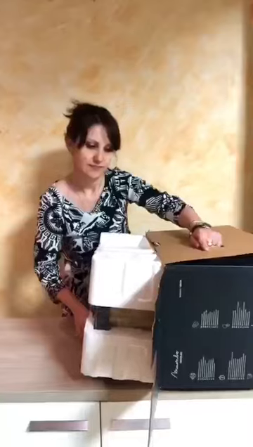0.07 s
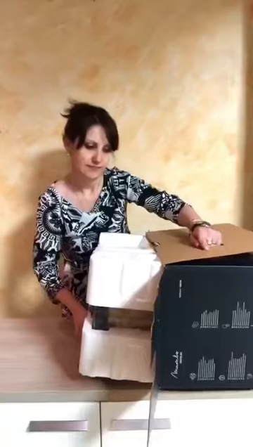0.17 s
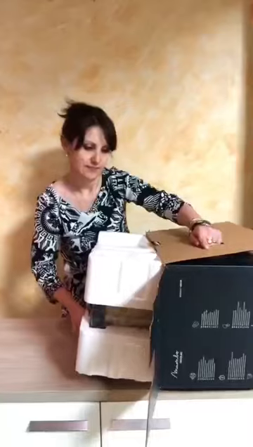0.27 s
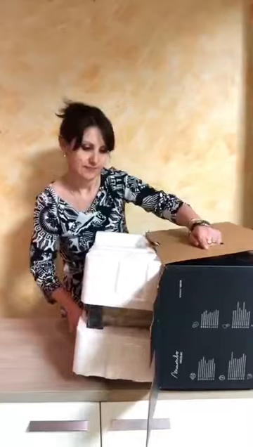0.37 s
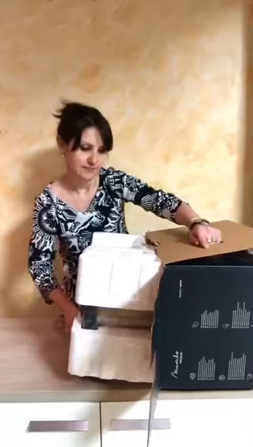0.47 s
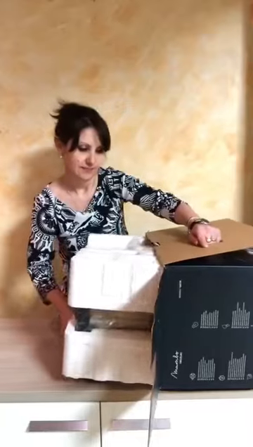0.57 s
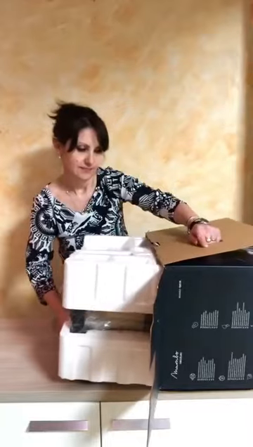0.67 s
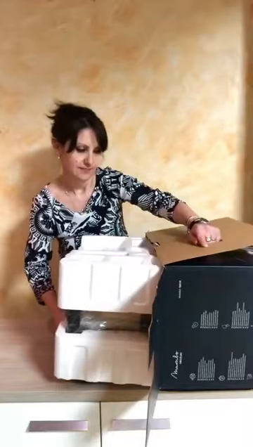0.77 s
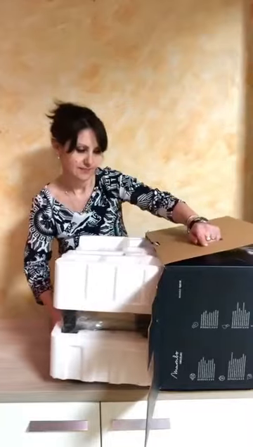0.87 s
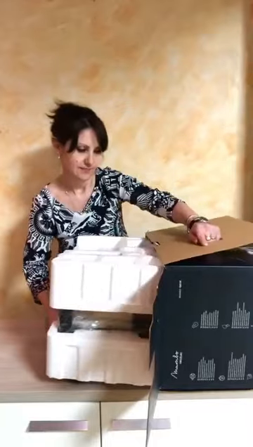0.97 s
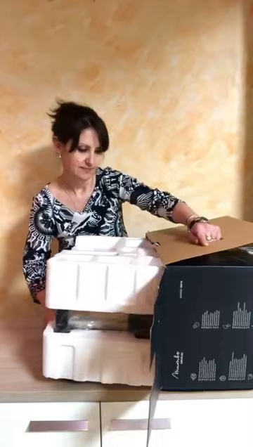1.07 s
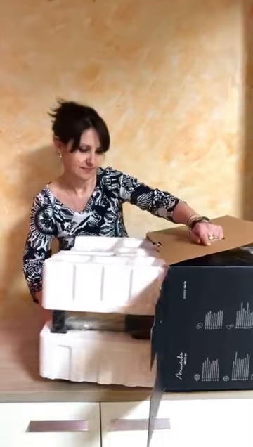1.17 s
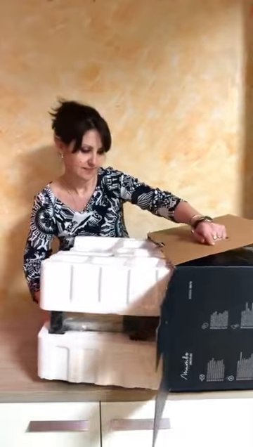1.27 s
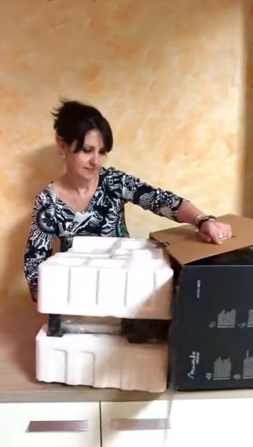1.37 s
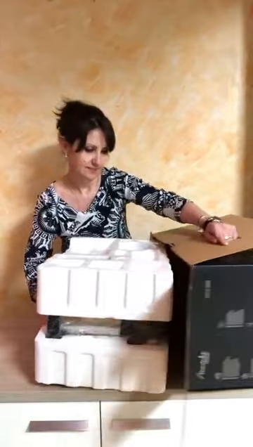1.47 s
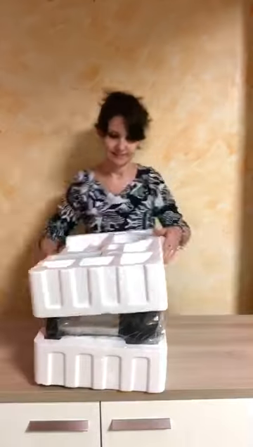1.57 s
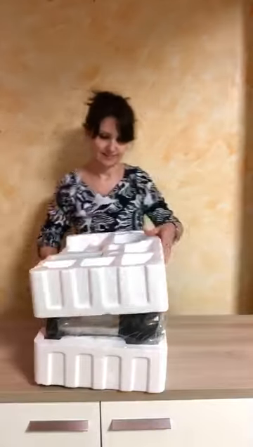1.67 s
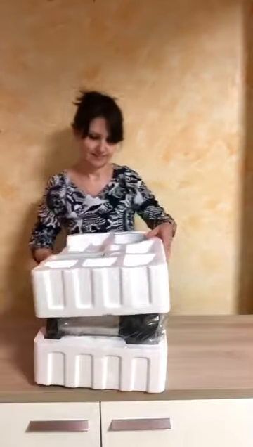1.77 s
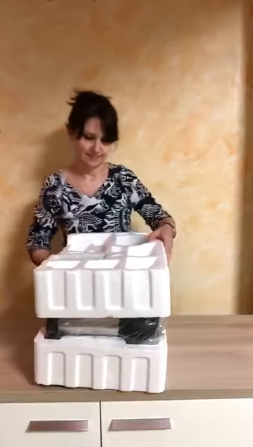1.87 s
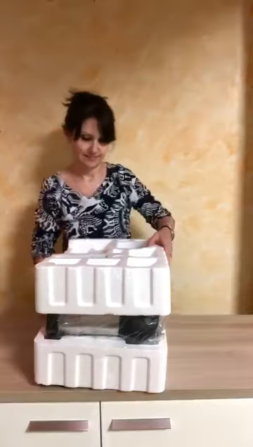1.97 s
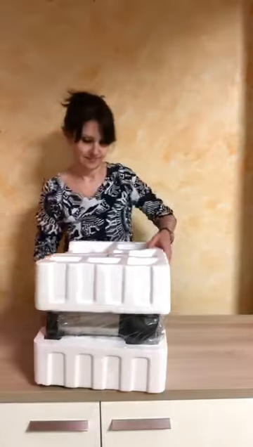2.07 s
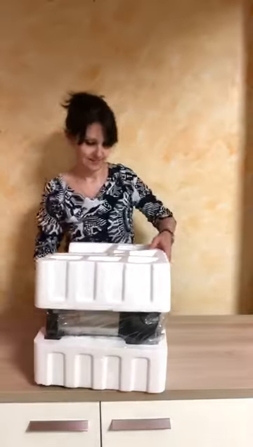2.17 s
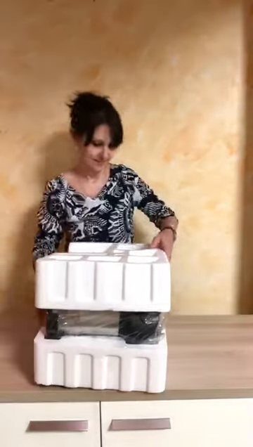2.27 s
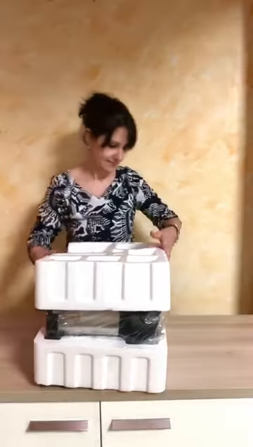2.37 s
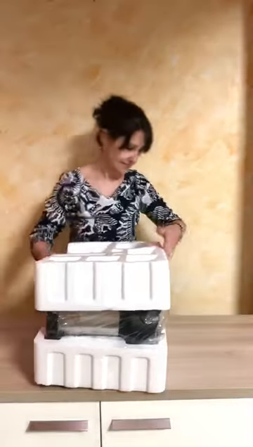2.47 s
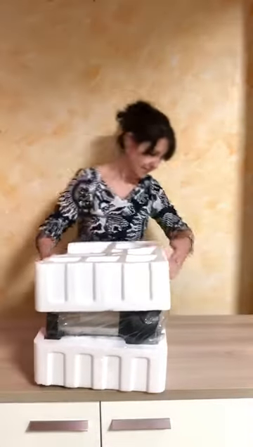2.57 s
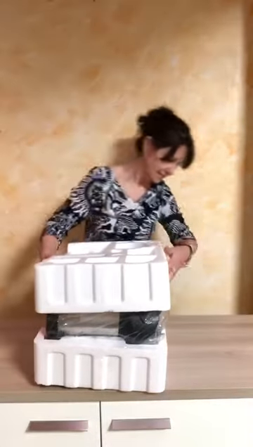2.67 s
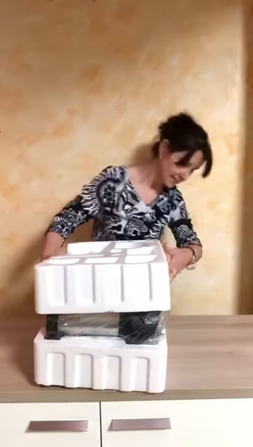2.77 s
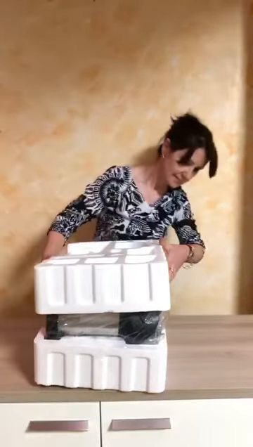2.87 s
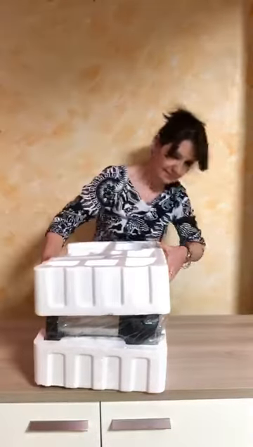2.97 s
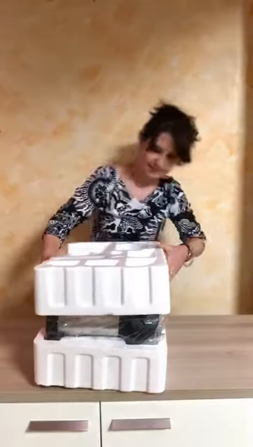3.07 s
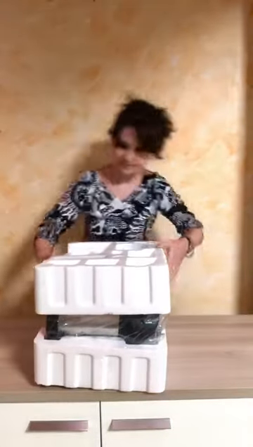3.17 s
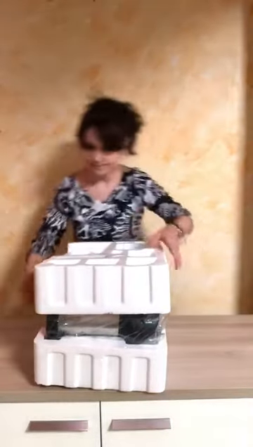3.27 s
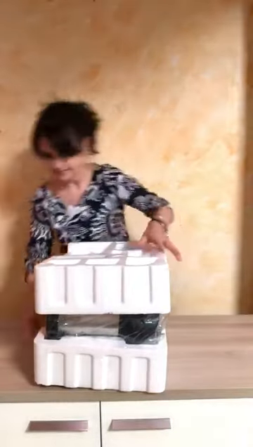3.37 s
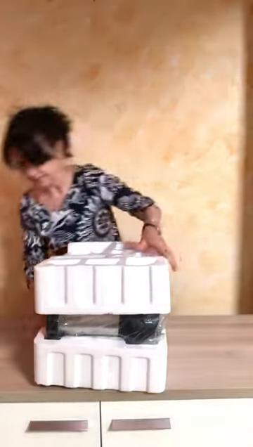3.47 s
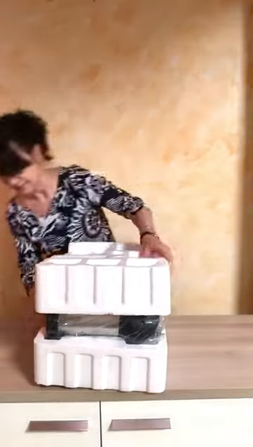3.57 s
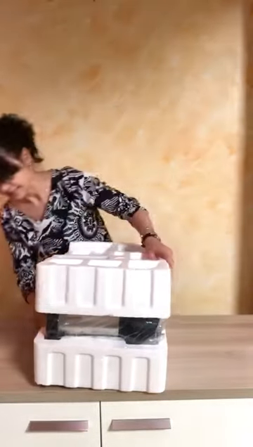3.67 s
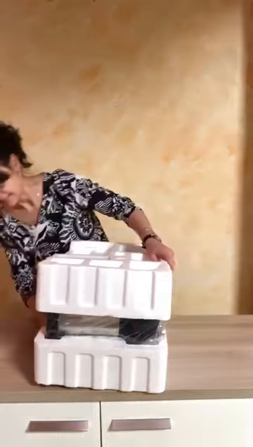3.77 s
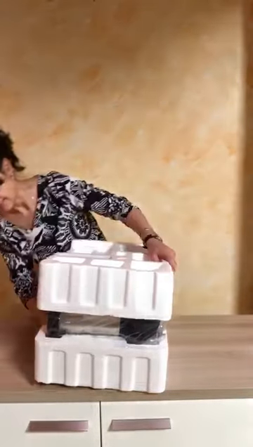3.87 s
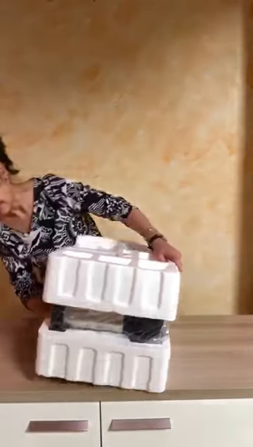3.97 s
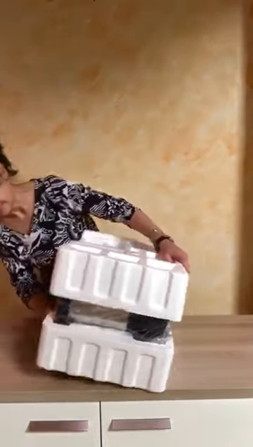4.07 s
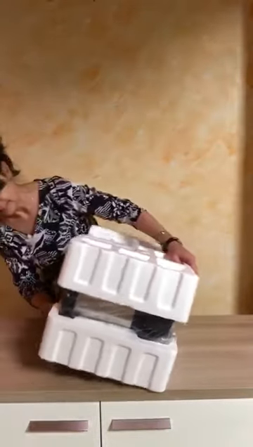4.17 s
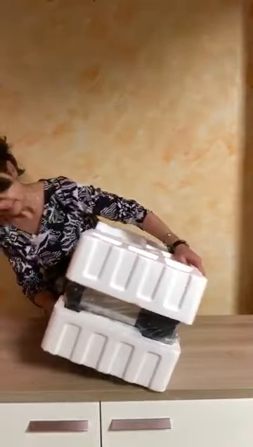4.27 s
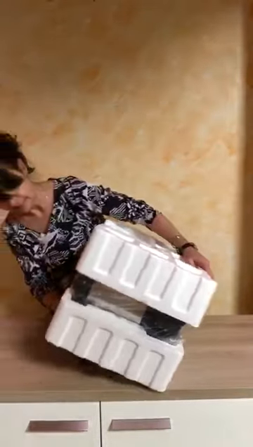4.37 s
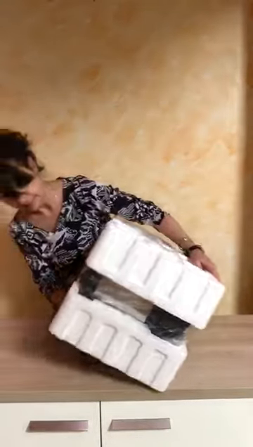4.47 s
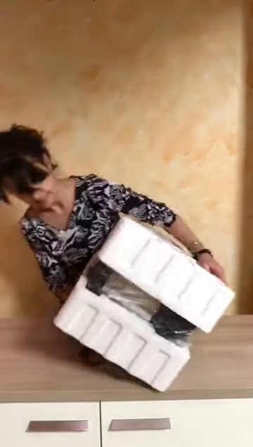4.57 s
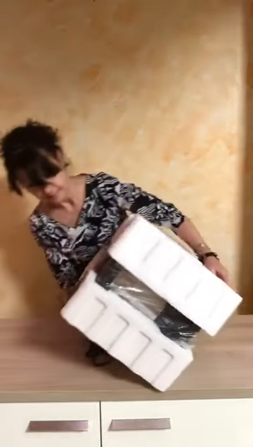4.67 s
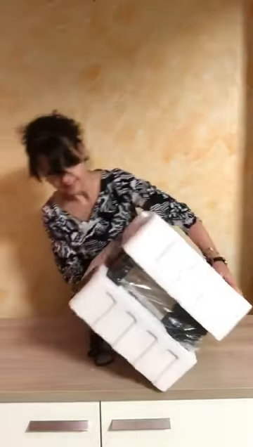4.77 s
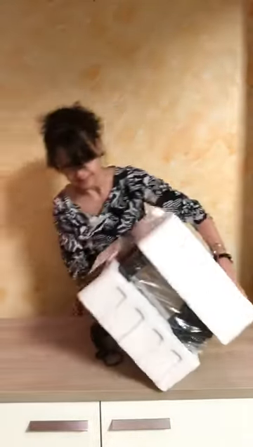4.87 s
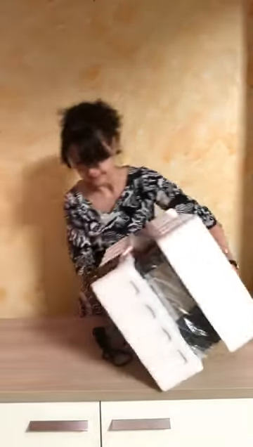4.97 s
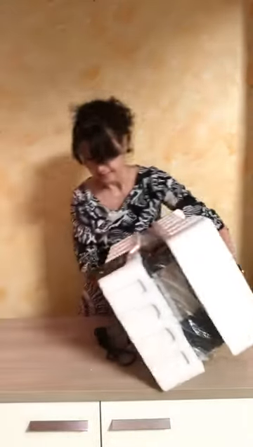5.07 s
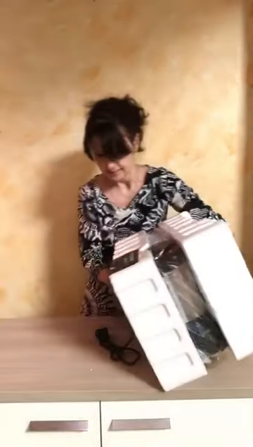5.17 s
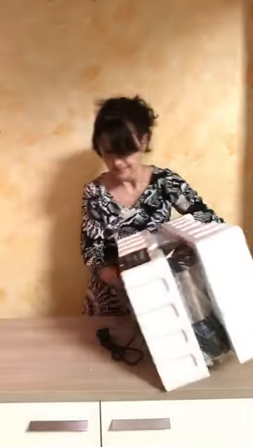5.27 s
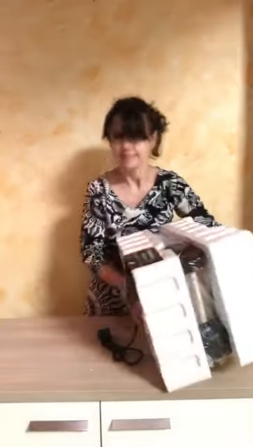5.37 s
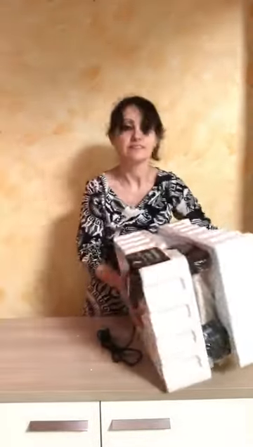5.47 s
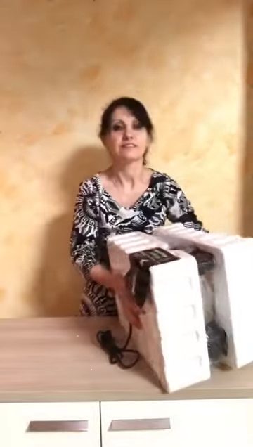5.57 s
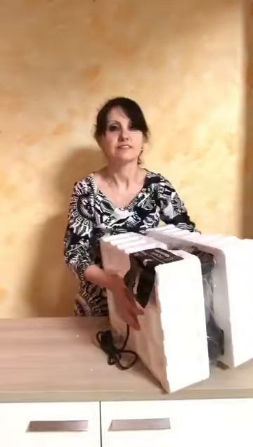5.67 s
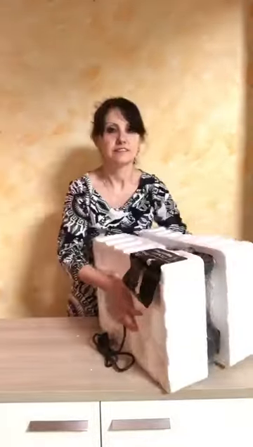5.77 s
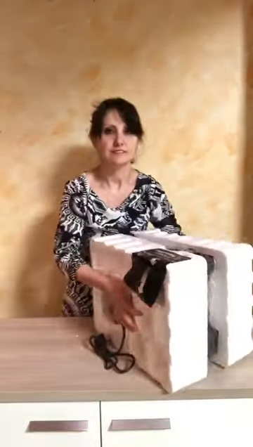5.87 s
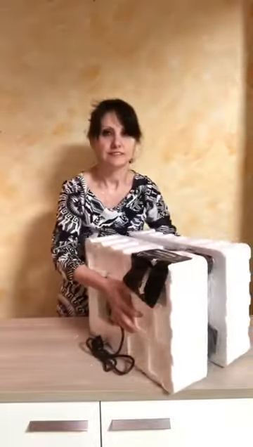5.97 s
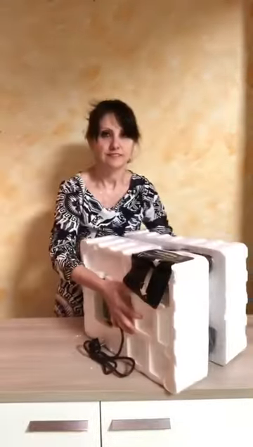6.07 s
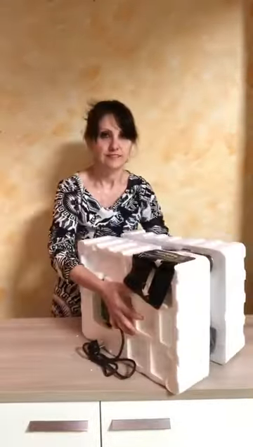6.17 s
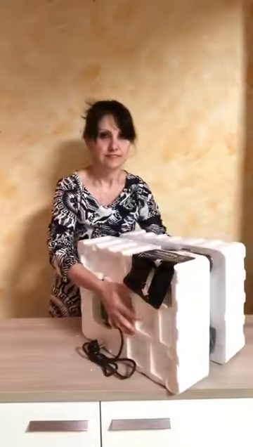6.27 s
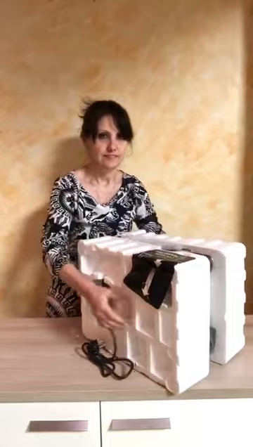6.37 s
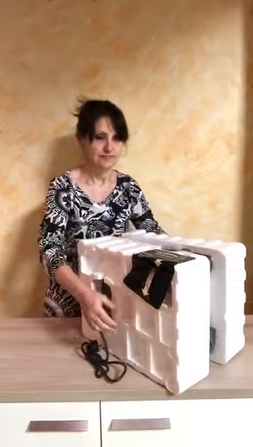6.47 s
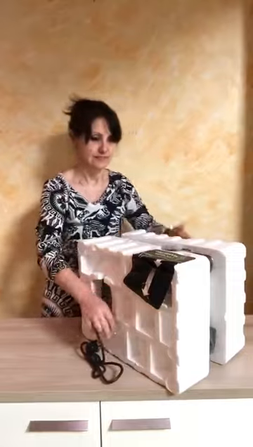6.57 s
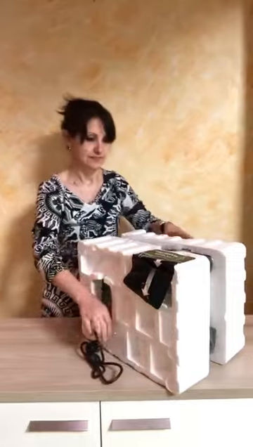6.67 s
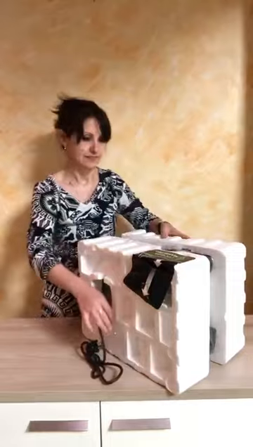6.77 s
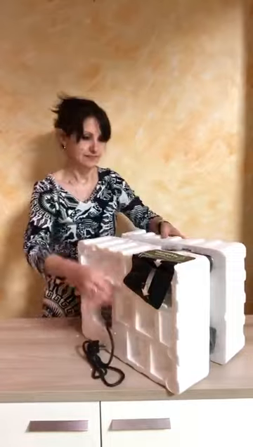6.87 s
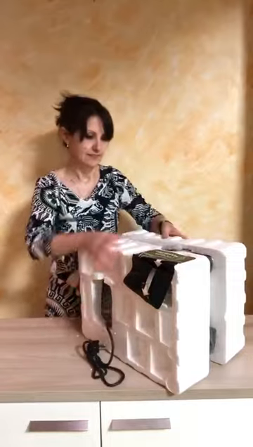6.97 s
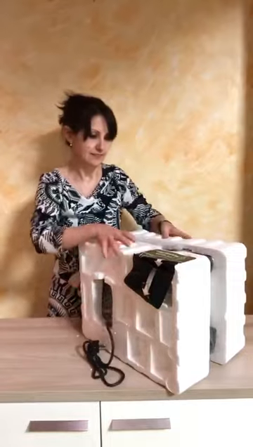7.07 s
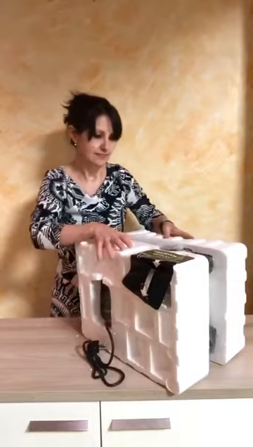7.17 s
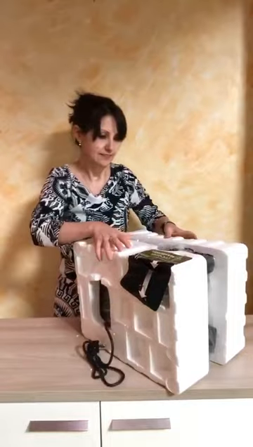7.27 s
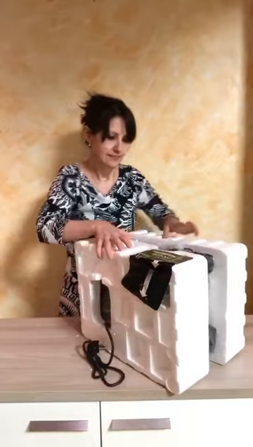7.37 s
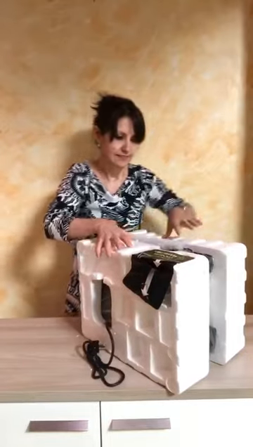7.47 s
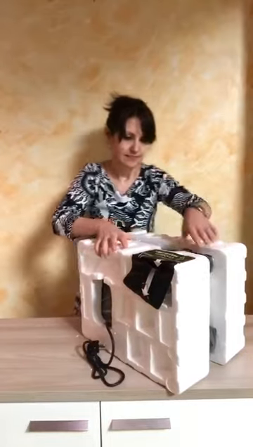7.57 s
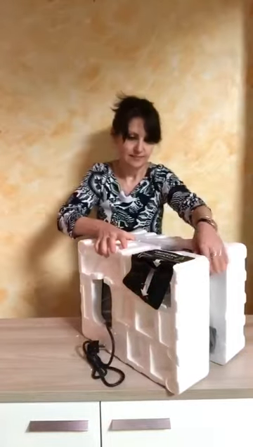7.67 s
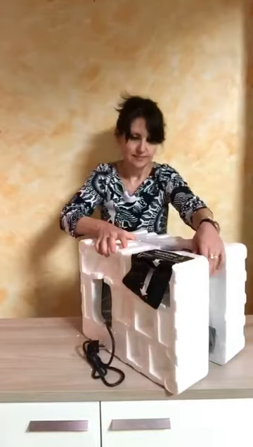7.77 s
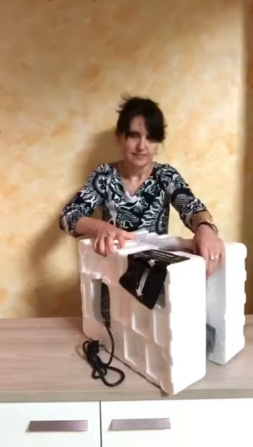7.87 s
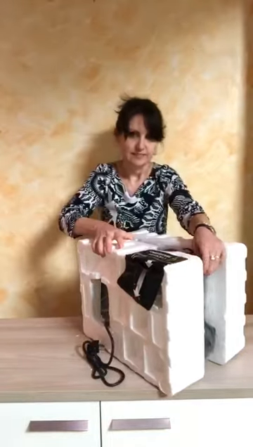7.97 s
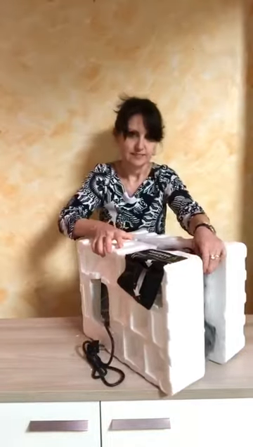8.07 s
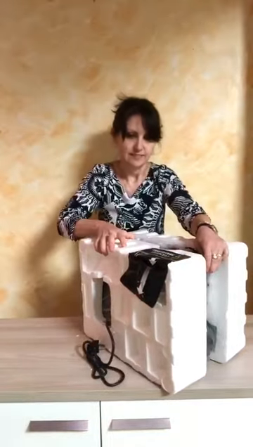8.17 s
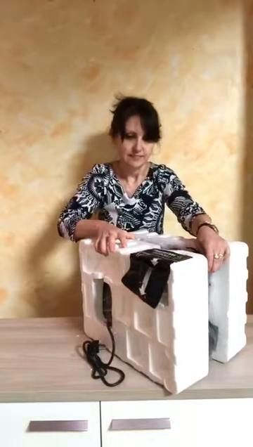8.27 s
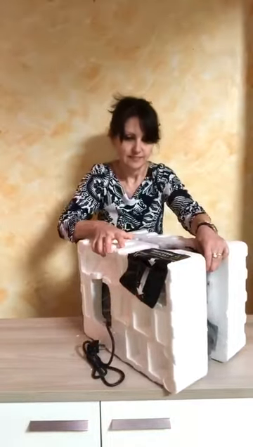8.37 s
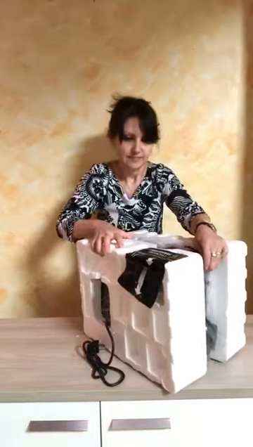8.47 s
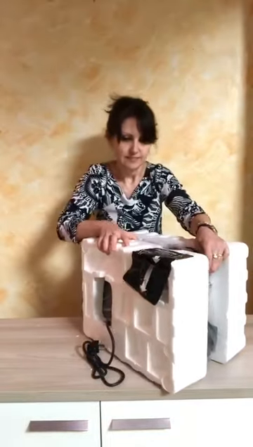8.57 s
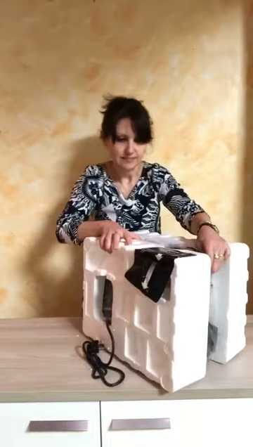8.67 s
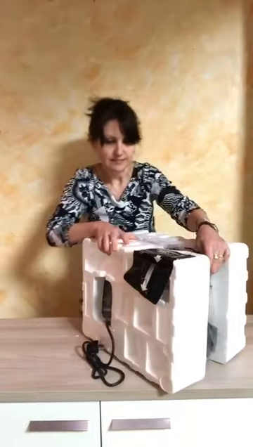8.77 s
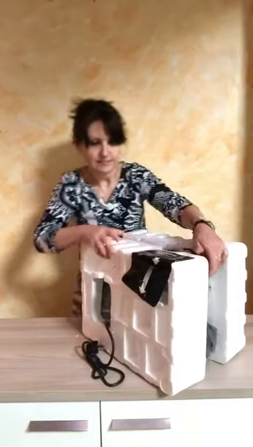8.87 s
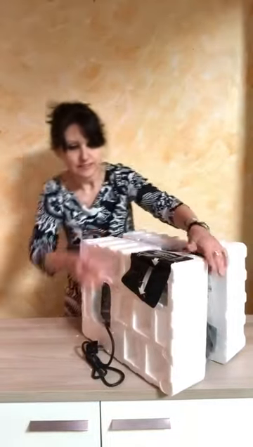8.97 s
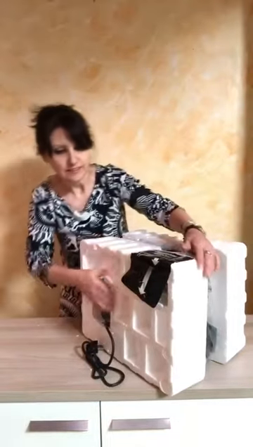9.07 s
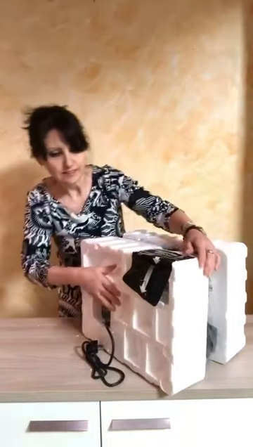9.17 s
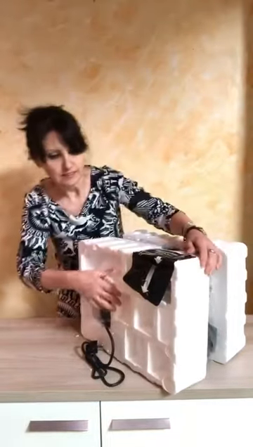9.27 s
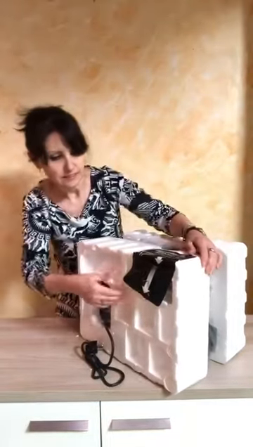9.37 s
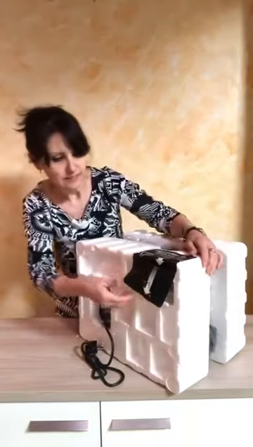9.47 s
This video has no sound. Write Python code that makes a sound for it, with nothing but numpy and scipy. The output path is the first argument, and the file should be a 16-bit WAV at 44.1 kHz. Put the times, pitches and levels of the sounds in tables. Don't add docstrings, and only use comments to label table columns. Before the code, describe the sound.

A small bare kitchen heard through one microphone with faint hiss. From 0 to 1.46 s foam slides out of a cardboard box: a brief rest, then a long grainy scrape, growing hissier, strongest near 1.2 s, with low weight settling at the end. It cuts abruptly; at 1.65 s the empty box lands, a loud hollow cardboard thud with papery slap and tiny bounces until 2 s. From 2 to 6.4 s hands rub and turn the foam pack in irregular swishes, with a squeaky click around 3.8 s, hollow knocks around 4.5 s and light rattling at 5.5-5.7 s. After another cut at 6.46 s the handling is quieter and sparser: film ticks near 7 s, sharp snaps at 7.1, 7.6 and loudest 7.78 s, a small crackle around 8.2 s. From 9 s, duller, darker rubs and soft knocks fade into room tone.

```python
import sys
import numpy as np
from scipy import signal
from scipy.fft import rfft, irfft
from scipy.io import wavfile
from scipy.ndimage import uniform_filter1d

SR = 44100
rng = np.random.default_rng(int(sys.argv[2]) if len(sys.argv) > 2 else 0)


def int16_out(signal):
    q = np.round(np.clip(np.atleast_2d(signal).T, -1, 1) * 32767)
    wavfile.write(sys.argv[1], SR, q.astype(np.int16))


def decibels_to_gain(level_db):
    exponent = np.asarray(level_db, float) / 20
    return 10 ** exponent


N = 418950

BORDERS_HZ = [450, 1600, 5000]
# [pitch_hz, level_db per Hz]
ON_CARD = [(24, -56), (60, -17.5), (290, -11), (435, -7), (514, -8), (1000, 0), (1240, -2.5), (2150, -0.5),
           (3000, -2), (7800, -1.5), (8200, -4.5), (11700, -8.5), (22000, -32)]
# [pitch_hz, level_db per Hz]
ON_FOAM = [(24, -100), (40, -49), (80, -19), (112, -12), (245, 5.5), (283, -19), (327, 0), (579, -2.5),
           (735, 0.5), (9010, 4.5), (10900, 3.5), (12000, -1.5), (15600, -48), (22000, -120)]
# [pitch_hz, width_hz, level_db]
RUB_MODES = [(217, 38, 1), (400, 36, -19), (592, 23, 15.5), (806, 61, 1), (1140, 110, 3), (1340, 23, 18),
             (2060, 55, -21.5), (4930, 550, -43)]
EDITS_S = [
    1.461,
    2.474,
    3.325,
    6.457,
    8.981,
]
FADE_IN_S = [0.016, .003, 0.0056, 0.0045, 0.0064]
# [time_s, scrape_db, weight_on_worktop_db]
SLIDE = [
    (0.0, -53.5, 13.5),
    (0.134, -42.5, -2),
    (0.276, -46.5, 4),
    (0.36, -43, -0.5),
    (1.13, -44, 3),
    (1.166, -40, -0.5),
    (1.35, -41, 12.5),
    (1.442, -49, 15.5),
    (1.46, -55, 16),
]
# [peak_s, rise_s, fall_s, scrape_db, brightness_db]
RUBS = [(1.54, 0.52, 1, -56, -1.5), (1.8, 0.066, 0.26, -52, 1), (1.99, 0.11, 0.098, -52.5, 2.5),
        (2.16, 0.27, 0.42, -53, -1), (2.34, 0.1, 0.17, -50.5, 1.5), (2.52, 0.84, 0.38, -53, -5.5),
        (2.74, .031, 0.11, -53, 0.5), (2.88, 0.099, 0.23, -56.5, 1.5), (3.1, 0.16, 0.12, -56, 2),
        (3.42, 0.66, 0.071, -54.5, -1.5), (3.54, 0.15, 0.24, -49, -2), (3.69, 0.055, 0.98, -50, -3),
        (3.837, 0.0075, 0.092, -45.5, 0), (3.95, .13, 0.092, -58, -17), (4.17, 0.054, 0.75, -57, 4.5),
        (4.28, 0.068, 0.1, -55, -3.5), (4.55, 0.12, 0.12, -59.5, 4.5), (4.75, 0.11, 0.19, -47, 2),
        (5.17, .19, 0.6, -48, -0.5), (5.39, 0.076, 1, -59.5, 14.5), (5.61, .27, 0.3, -53.5, 6.5),
        (5.97, 1, 0.18, -50.5, -6), (6.19, 0.082, 0.13, -49.5, 3),
        (6.49, 0.23, 0.43, -60, 0.5), (6.74, 0.014, 0.12, -55.5, -4), (6.96, 0.043, 0.12, -51, -2.5),
           (7.11, 0.27, 0.12, -53, -1), (7.16, .02, .96, -57.5, -6), (7.41, 0.2, .14, -49, -4),
           (7.56, .12, 0.33, -60.5, 4), (7.78, 0.2, 0.14, -55.5, 3), (8.14, 0.16, 0.054, -58, -7),
           (8.28, 0.13, 0.14, -57.5, -5), (8.48, 0.079, 0.13, -48, -5.5), (8.74, 0.22, 0.14, -50.5, 0.5),
           (8.83, 0.043, 0.064, -52.5, 3), (8.95, 0.16, 0.37, -62.5, -13), (9.0, 0.017, 0.067, -49, -9.5),
           (9.09, 0.062, 0.057, -50, -12), (9.17, 0.075, 0.13, -48, -8), (9.29, 0.074, 0.1, -47.5, -19),
           (9.47, 0.13, 0.27, -54, -19)]
# [peak_s, rise_s, fall_s, block_db, weight_db]
DRAGS = [(1.55, .3, 0.64, -56, -10), (1.95, 0.11, 0.21, -52, -7), (2.27, 0.18, 0.37, -59, -2.5),
         (2.56, 0.97, 0.15, -54.5, -1.5), (2.83, 0.15, 0.25, -54.5, -10), (3.04, 0.15, 0.18, -57.5, -18),
         (3.44, 0.058, 1, -55, -24), (3.73, 0.21, 0.53, -53.5, -31), (3.95, .07, 0.69, -58.5, -9.5),
         (4.45, 0.17, .066, -57, -20), (4.56, 0.14, 0.08, -51.5, -6.5), (4.82, 0.57, 0.31, -56, -14),
         (5.07, 0.13, 0.067, -53, -9), (5.63, 0.12, 0.31, -54.5, -8.5), (6.11, 0.17, 0.14, -53.5, -30),
         (6.68, 0.32, 0.82, -64.5, -8.5), (6.99, 0.061, 0.19, -67, 7.5), (7.2, 0.067, 0.11, -53, -12),
         (7.57, 0.24, 0.37, -49, -13.5), (7.73, 0.13, 0.17, -50.5, -11), (8.29, 1, 0.23, -63, -5.5),
         (8.5, 0.15, 0.12, -62, 1.5), (8.69, 0.24, 0.25, -50, -17), (8.99, 0.027, 0.45, -55, 2)]
# [start_s, length_s, centre_hz, relative_half_width (ratio), level_db]
SHEENS = [(1.474, 0.021, 1500, 0.97, -49.5), (1.24, 0.15, 390, 0.11, -49), (5.3, 0.38, 4600, .06, -55),
          (5.48, .18, 7900, .05, -57), (6.725, 0.031, 6100, 0.15, -47), (6.76, 0.026, 8900, 0.33, -56),
          (6.48, .07, 9300, .2, -56), (6.565, .03, 5500, .3, -53), (6.938, 0.031, 8300, 0.11, -47),
          (7.785, .03, 8000, 0.11, -44), (7.11, .035, 8400, .1, -60), (7.172, 0.014, 7000, .12, -48),
          (7.05, .03, 3700, .2, -49.5), (8.69, 0.18, 5800, .06, -55), (11, 0.13, 3900, .05, -62),
          (13, 0.091, 1900, .1, -53), (6.5, .07, 570, .1, -59.5), (10, .05, 850, .15, -50),
          (9.21, .13, 880, 0.24, -58), (9.0, 0.095, 350, 1, -52), (3.5, 0.045, 3300, .5, -43),
          (9.34, 0.15, 620, 0.43, -58.5), (9.26, 0.097, 240, 0.36, -59)]
# [start_s, length_s, pitch_hz, level_db]
HOOTS = [(2.489, 0.14, 218.6, -54.5), (3.751, 0.063, 616, -54), (3.836, 0.014, 1840, -42),
         (3.85, 0.02, 2590, -50), (5.679, 0.04, 427, -59), (6.536, 0.073, 1114, -61),
         (6.634, 0.009, 625, -55), (8.475, 0.03, 5370, -53), (8.607, 0.083, 772, -54),
         (8.62, 0.13, 1340, -56), (8.742, 0.072, 592, -57), (8.68, 0.097, 1140, -54),
         (5.986, 0.063, 447, -57.5), (9.003, 0.49, 70, -67.5), (9.158, 0.018, 1038, -47.5),
         (4.415, 0.037, 1440, -59)]
# [start_s, peak_db]
DROPS = [
    (1.6556, -11.5),
    (1.671, -10.5),
    (1.705, -17.5),
    (1.864, -31.5),
    (1.959, -34.5),
]
# [pitch_hz, level_db, t60_s]
LANDING_MODES = [(154, -16, 0.12), (221, 2, 0.2), (282, -7.5, 0.17), (380, 7, 0.19), (426, 1, 0.075),
                 (508, -14, 0.16), (590.5, 4, 0.21), (700, -18, 0.097), (750, -16, 0.093), (786, 4.5, 0.18),
                 (924, -5, 0.16), (1030, -6, 0.16), (1153, -4, 0.16), (1240, -4, 0.145), (1400, -17, 0.1),
                 (1570, -20, 0.09), (1995, -15, .12), (2900, -13, 0.14)]
# [pitch_hz, level_db, t60_s]
CORNER = [(670, 6, 0.014), (1570, 0.5, 0.011), (3030, -12, 0.02), (3940, -16, 0.024)]
# [start_s, peak_db, ring_hz, low_tick_db against the peak, t60_s]
SNAPS = [(3.681, -29, 4640, 8, 0.026), (3.834, -22.5, 4340, 0.5, 0.037), (3.9183, -28, 7380, -30, 0.04),
         (4.518, -37, 4590, -9, 0.04), (6.7345, -35.5, 6300, -5.5, 0.06), (6.9562, -27, 4250, 0.5, 0.035),
         (6.9647, -34, 3220, 5, 0.03), (6.9725, -33.5, 3400, 2, 0.03), (6.9842, -23.5, 6600, -14, 0.035),
         (7.5445, -38, 6000, -8, 0.04), (7.1046, -13, 8200, -13.5, 0.045), (7.554, -22.5, 7600, 3.5, 0.028),
         (7.6098, -19.5, 6800, -14, 0.03), (7.7762, -10.5, 7640, -11.5, 0.047),
         (8.1138, -35, 7040, 4.5, 0.032), (8.1418, -37, 4220, 10, 0.022), (8.199, -32, 5160, 4.5, 0.032),
         (8.2191, -30, 6300, 1, 0.036), (8.2617, -26, 5000, -0.5, 0.035), (8.283, -26.5, 6840, -4, 0.13),
         (8.2962, -36, 5050, 7.5, 0.053), (8.9455, -43, 4060, 2, 0.04), (9.002, -38, 4970, 4, 0.046),
         (9.164, -31, 4400, -1, 0.043), (9.447, -42, 4400, 4, 0.058)]
# [start_s, peak_db, pitch_hz, t60_s]
KNOCKS = [(2.259, -38, 804, 0.08), (2.556, -29, 910, 0.06), (2.55, -40, 227, 0.19),
          (3.42, -30.5, 658, 0.056), (3.679, -33, 633, 0.13), (3.833, -34, 1165, 0.076),
          (4.285, -32.5, 325, 0.073), (4.42, -32, 871, 0.14), (4.455, -43, 2200, 0.033),
          (4.535, -34.5, 520, 0.12), (4.4545, -24, 890, 0.049), (4.545, -38, 511, 0.1),
          (4.563, -36, 239, 0.13), (6.742, -35, 1140, 0.084), (6.974, -43, 350, 0.032),
          (6.982, -31, 199, 0.045), (6.966, -30, 1400, 0.026), (7.036, -37, 900, 0.04),
          (7.022, -26, 1040, 0.039), (7.179, -33.5, 532, 0.12), (7.373, -38, 1490, 0.09),
          (7.558, -21, 546, 0.057), (7.553, -28, 1300, 0.028), (7.553, -30, 2610, 0.02),
          (7.583, -38, 555, 0.055), (7.623, -31, 1180, 0.032), (7.099, -32, 1700, 0.025),
          (7.735, -23.5, 822, 0.061), (8.14, -36, 580, 0.064), (8.261, -37.5, 332, 0.1),
          (8.483, -37, 326, 0.16), (8.986, -28, 420, 0.065), (9.001, -28.5, 171, 0.11),
          (9.168, -37, 266, 0.086), (9.234, -37, 685, 0.05)]
# [start_s, peak_db, pitch_hz]
TAPS = [(2.257, -37, 1500), (2.2615, -40, 744), (2.354, -42, 900), (2.555, -37.5, 700), (2.733, -40, 2260),
        (2.753, -44, 910), (2.767, -37, 956), (2.813, -40.5, 472), (7.736, -34, 850), (5.507, -45, 900),
        (5.539, -41, 1000), (5.571, -43, 940), (5.587, -37, 980), (5.607, -40, 600), (4.4554, -34, 895),
        (5.638, -38.5, 466), (5.65, -37, 950), (5.671, -43, 477), (5.704, -42, 428), (6.084, -40, 960),
        (6.677, -45, 380), (7.025, -33, 1500), (7.028, -37, 990), (8.472, -40, 750), (8.483, -38, 413),
        (8.497, -35, 335), (8.946, -48, 1080), (8.965, -48, 660), (9.018, -44, 300), (9.057, -44, 400),
        (9.286, -42, 890)]
# [pitch_hz, t60_s]
ROOM = [(150, 0.56), (400, 0.55), (1040, 0.44), (1600, 0.49), (2760, 0.68), (7280, 0.5)]
# [pitch_hz, level_db per Hz]
AIR = [(18, -49), (30, -38), (59, -3), (102, 3.5), (146, -3), (333, 2), (2730, -7.5), (4080, -9),
       (12000, -16.5), (15600, -65), (22000, -120)]
BAND_EDGES_HZ = [55, 11780, 12250]

BOX_GONE_S = 1.461
SLIDE_RUMBLE_DB, SLIDE_BLOCK_DB, BLOCK_PER_WEIGHT = -17, -6.5, 0.61
SLIDE_HISS_DB, HISS_GAIN_DB_PER_S = -9, 6
STROKE_DB, STROKE_BEND = 20, 1.5
RUB_RUMBLE_DB, RUB_BLOCK_DB, DRAG_SCRAPE_DB = -17, -8.5, -10.5
PIN_CYCLES, TAP_CYCLES = 17, 9.7
AIR_DB = -65


def evened(x):
    return x / np.sqrt(np.mean(x ** 2) + 1e-20)


def read(points, hz):
    f, value = np.transpose(points)
    return np.interp(np.log(hz + 1), np.log(f + 1), value)


def add(mix, s, sound):
    part = mix[round(s * SR):][:len(sound)]
    part += sound[:len(part)]


def swelling(rise_s, count):
    return 1 - np.exp(-np.arange(count) / SR / rise_s)


def ring(hz, t60, rise_s, count):
    t = np.arange(count) / SR
    return decibels_to_gain(-60 * t / t60) * np.sin(2 * np.pi * hz * t) * swelling(rise_s, count)


def puff(hz, width, t60, count, order=1):
    edges = np.clip([hz / (1 + width), hz * (1 + width)], 40, 0.45 * SR)
    noise = signal.lfilter(*signal.butter(order, edges, "band", fs=SR), rng.standard_normal(count))
    burst = noise * decibels_to_gain(-60 * np.arange(count) / SR / t60)
    return burst / abs(burst).max()


def patches(shape, bins, frames):
    field = rng.standard_normal(shape[::-1]).T
    return evened(uniform_filter1d(uniform_filter1d(field, bins, 0), frames, 1))


def rubbing():
    drive = slips(per_s=1500, spread_db=2.2, tail_s=0.015) + 1.25 * rng.standard_normal(N)
    hz, t, z = signal.stft(drive, SR, nperseg=512, noverlap=384)
    hollow = sum(decibels_to_gain(db) / (1 + (2 * (hz - f) / width) ** 2) for f, width, db in RUB_MODES)
    on_card = decibels_to_gain(read(ON_CARD, hz))
    on_foam = decibels_to_gain(read(ON_FOAM, hz)) * (1 + 0.23 * hollow)
    colour = np.where(t < BOX_GONE_S, on_card[:, None], on_foam[:, None])
    wander_db = 0.95 * patches(z.shape, bins=6, frames=16)
    wander_db += 0.51 * patches((1, len(t)), bins=1, frames=6)
    wander_db += 2.3 * patches(z.shape, bins=1, frames=40)
    wander_db += 0.6 * patches(z.shape, bins=14, frames=120)
    above = [1 / (1 + (edge / (hz + 1)) ** 6) for edge in BORDERS_HZ]
    shares = [above[1] - above[2], 1 - above[0], above[0] - above[1], above[2]]
    out = np.zeros(N)
    for share, gain in zip(shares, pressure()):
        band = colour * np.sqrt(np.maximum(share, 0))[:, None]
        band = band / np.sqrt((band ** 2).mean(0))
        layer = signal.istft(z * band * decibels_to_gain(wander_db), SR, nperseg=512, noverlap=384)[1][:N]
        out += evened(layer) * gain
    return out


def slips(per_s, spread_db, tail_s):
    size = decibels_to_gain(spread_db * np.minimum(rng.exponential(1, N), 5))
    size = size * (rng.random(N) < per_s / SR)
    tail = decibels_to_gain(-60 * np.arange(3000) / SR / tail_s)
    power = abs(signal.oaconvolve(size ** 2, tail ** 2)[:N])
    return evened(np.sqrt(power) * rng.standard_normal(N))


def pressure():
    t = np.arange(0, N / SR + 0.002, 0.002)
    s, db, weight_db = np.transpose(SLIDE)
    scrape_db = np.interp(t, s, db)
    weight_db = np.interp(t, s, weight_db)
    slide = decibels_to_gain([scrape_db,
                 scrape_db + SLIDE_RUMBLE_DB + weight_db,
                 scrape_db + SLIDE_BLOCK_DB + BLOCK_PER_WEIGHT * weight_db,
                 scrape_db + SLIDE_HISS_DB + HISS_GAIN_DB_PER_S * t])
    rub, hiss = strokes(RUBS, t)
    drag, rumble = strokes(DRAGS, t)
    hands = np.sqrt([rub + drag * decibels_to_gain(DRAG_SCRAPE_DB) ** 2,
                     rumble + rub * decibels_to_gain(RUB_RUMBLE_DB) ** 2,
                     drag + rub * decibels_to_gain(RUB_BLOCK_DB) ** 2,
                     hiss])
    gains = np.where(t < BOX_GONE_S, slide, hands)
    return [np.interp(np.arange(N) / SR, t, gain) for gain in gains]


def strokes(rows, t):
    peak, rise, fall, db, colour_db = np.transpose(rows)[:, :, None]
    away = np.where(t < peak, (peak - t) / rise, (t - peak) / fall)
    same_shot = np.searchsorted(EDITS_S, peak) == np.searchsorted(EDITS_S, t)
    power = same_shot * decibels_to_gain(db - STROKE_DB * away ** STROKE_BEND) ** 2
    return power.sum(0), (power * decibels_to_gain(colour_db) ** 2).sum(0)


def sheens():
    out = np.zeros(N)
    for s, length, hz, width, db in SHEENS:
        edges = [hz / (1 + width), min(hz * (1 + width), 0.45 * SR)]
        band = signal.butter(2, edges, "band", fs=SR, output="sos")
        hiss = signal.sosfilt(band, rng.standard_normal(24000))[:round(length * SR)]
        add(out, s, decibels_to_gain(db) * evened(hiss) * np.hanning(len(hiss)))
    return out


def hoots():
    out = np.zeros(N)
    for s, length, hz, db in HOOTS:
        wander = uniform_filter1d(rng.standard_normal((24000, 2)), 500, 0)[:round(length * SR)]
        turn = 2 * np.pi * hz * np.arange(len(wander)) / SR
        tone = (0.061 + wander[:, 0]) * np.cos(turn) + wander[:, 1] * np.sin(turn)
        add(out, s, decibels_to_gain(db) * evened(tone) * signal.windows.tukey(len(turn), 0.6))
    return out


def corner_blow():
    out = np.zeros(N)
    first_s = DROPS[0][0]
    blow = sum(decibels_to_gain(db) * ring(hz, t60, 0.0032, count=3000) for hz, db, t60 in CORNER)
    add(out, first_s + 0.0012, decibels_to_gain(-8) * blow / abs(blow).max())
    soft_start = signal.windows.tukey(8000, 0.06)[:4000]
    add(out, first_s - 0.003, decibels_to_gain(-15) * puff(2000, 0.74, 0.034, count=4000) * soft_start)
    return out


def box_drop():
    out = np.zeros(N)
    count = 16000
    for s, db in DROPS:
        late = rng.integers(0, 200, len(LANDING_MODES))
        modes = np.zeros(count)
        for (hz, mode_db, t60), delay in zip(LANDING_MODES, late):
            modes += np.roll(decibels_to_gain(mode_db) * ring(hz, 0.35 * t60, 0.0068, count), delay)
        slap = 0.62 * puff(664, 0.83, 0.11, count, order=2)
        slap += 0.15 * puff(1900, 0.69, 0.06, count)
        slap += 0.17 * puff(4000, 0.33, 0.085, count)
        thump = 0.23 * puff(196, 1.0, 0.16, count)
        landing = 0.59 * modes / abs(modes).max() + swelling(0.0017, count) * (slap + thump)
        add(out, s, decibels_to_gain(db) * landing)
    return out


def snaps():
    out = np.zeros(N)
    for s, db, hz, low_db, t60 in SNAPS:
        pin = ring(hz, PIN_CYCLES / hz, 0.00017, count=4000)
        crack = pin / abs(pin).max()
        crack += 0.63 * puff(hz, 0.26, 0.57 * t60, count=4000, order=2)
        crack += 0.15 * puff(4500, 2.2, 0.3 * t60, count=4000)
        fizz = 0.13 * puff(hz, 0.31, 1.8 * t60, count=4000, order=2)
        add(out, s + 0.0004, decibels_to_gain(db - 8) * (crack + fizz))
        add(out, s + 0.00119, decibels_to_gain(db - 6.5 + low_db) * puff(1380, 1.8, t60, count=4000))
    return out


def knocks():
    out = np.zeros(N)
    for s, db, hz, t60 in KNOCKS:
        note = ring(hz, t60, 0.0062, count=9000)
        note += 0.5 * ring(1.6 * hz, 0.48 * t60, 0.002, count=9000)
        dull = swelling(0.0025, 9000) * puff(hz, 0.19, t60, count=9000)
        add(out, s, decibels_to_gain(db - 3.5) * (0.55 * note + 0.54 * dull))
    return out


def taps():
    out = np.zeros(N)
    for s, db, hz in TAPS:
        t60 = TAP_CYCLES / hz
        note = ring(hz, t60, 0.001, count=3000)
        note += 0.65 * ring(2.12 * hz, 0.62 * t60, 0.00086, count=3000)
        grain = 0.22 * puff(1.6 * hz, 1.4, 0.018, count=3000)
        add(out, s, decibels_to_gain(db) * (note / abs(note).max() + grain))
    return out


def room(x):
    echoes = np.zeros(SR)
    at = np.arange(300, SR - 20, 20)
    echoes[at + rng.integers(0, 20, len(at))] = rng.choice([-1.0, 1.0], len(at))
    hz, t, z = signal.stft(echoes, SR, nperseg=256)
    decay = decibels_to_gain(-60 * t / read(ROOM, hz)[:, None])
    tail = signal.istft(z * decay, SR, nperseg=256)[1]
    return signal.fftconvolve(x, tail / np.linalg.norm(tail))[:N]


def air():
    hz = np.fft.rfftfreq(N, 1 / SR)
    spectrum = rfft(rng.standard_normal(N)) * decibels_to_gain(read(AIR, hz))
    return decibels_to_gain(AIR_DB) * evened(irfft(spectrum, N))


def scene():
    foam = rubbing() + sheens()
    drop, corner = box_drop(), corner_blow()
    small = snaps() + knocks() + hoots() + taps()
    echoes = room(decibels_to_gain(-4.5) * drop + decibels_to_gain(-15) * corner + decibels_to_gain(-9.5) * small)
    mono = foam + drop + corner + small + echoes + air()
    return np.array([mono, mono])


def filled_bands(mono):
    hz, t, z = signal.stft(mono, SR, nperseg=2048, noverlap=1024)
    when, low, wide = rng.random((len(t), 3)).T
    low_hz = 4100 + 4500 * low
    wide_hz = 1300 + 1000 * wide ** 2
    chosen = (when < 0.075) & (hz[:, None] > low_hz) & (hz[:, None] < low_hz + wide_hz)
    level = np.sqrt(abs(uniform_filter1d(abs(z) ** 2, 30, 0)))
    noise = chosen * level * np.exp(2j * np.pi * rng.random(z.shape))
    return signal.istft(noise, SR, nperseg=2048, noverlap=1024)[1][:N]


def low_pass(x):
    return signal.sosfilt(signal.butter(12, 12710, fs=SR, output="sos"), x)


def record(dry):
    low_cut, usual_top, wide_top = BAND_EDGES_HZ
    mono = signal.sosfilt(signal.butter(3, low_cut, "high", fs=SR, output="sos"), dry[0])
    for s, fade in zip(EDITS_S, FADE_IN_S):
        since = np.arange(N) / SR - s
        mono = mono * np.where(since < 0, 1, np.clip(since / fade, 0.1, 1))
    usual, wide = [signal.oaconvolve(mono, signal.firwin(401, top, window=("kaiser", 7), fs=SR), "same")
                   for top in (usual_top, wide_top)]
    opened = np.repeat(rng.random(N // 2048 + 1) < 0.2, 2048)[:N]
    for s, db, *_ in SNAPS:
        add(opened, s - 0.004, np.full(1024, db > -20))
    mono = usual + uniform_filter1d(1.0 * opened, 600) * (wide - usual)
    side = decibels_to_gain(1.5) * filled_bands(mono)
    return low_pass(np.array([mono + side, mono - side]))


dry = scene()
out = record(dry)
int16_out(out)
```